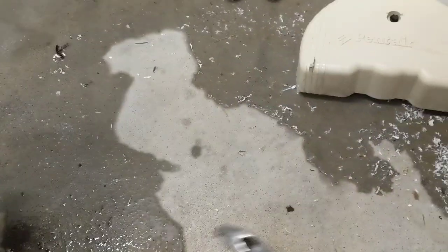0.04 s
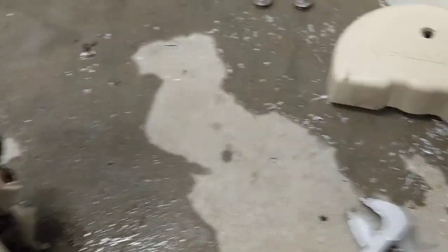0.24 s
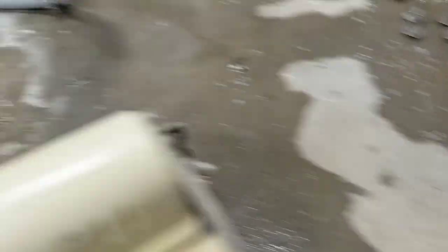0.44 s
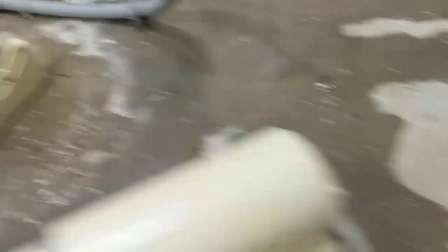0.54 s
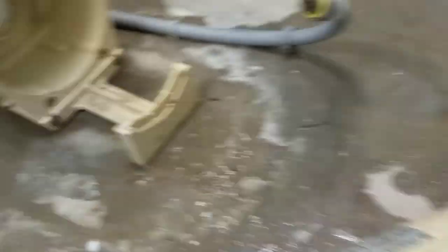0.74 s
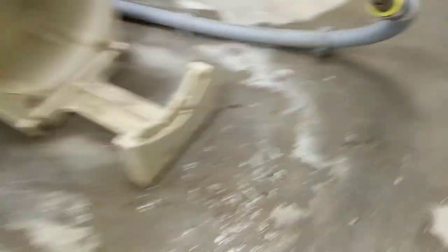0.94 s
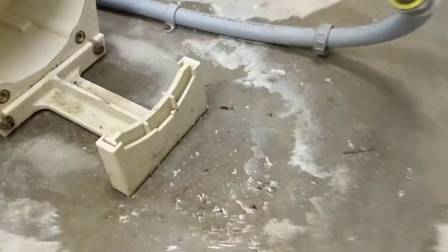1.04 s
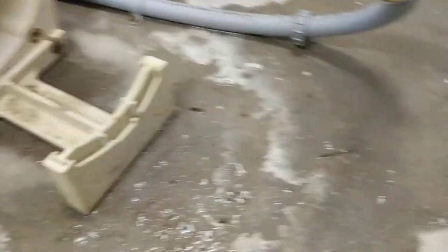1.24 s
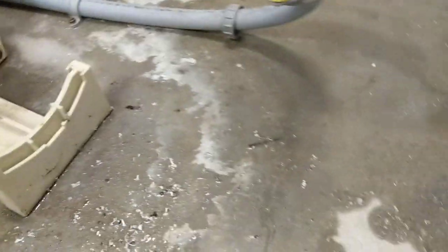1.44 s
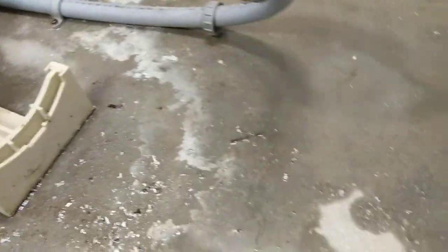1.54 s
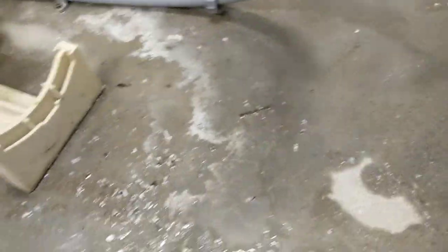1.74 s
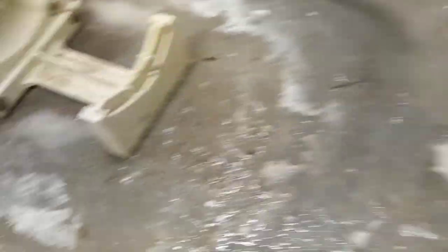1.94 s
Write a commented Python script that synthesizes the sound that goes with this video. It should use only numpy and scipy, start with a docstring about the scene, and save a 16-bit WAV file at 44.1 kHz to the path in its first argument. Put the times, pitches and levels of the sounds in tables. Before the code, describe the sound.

Three quick, bright clinks ring out close by as a dropped wrench bounces on concrete. After a short pause come boxy knocks, a gritty scrape and small clicks from a shifted plastic pump housing. The bare room echoes.

```python
"""A bare, echoing room with a concrete floor. A dropped steel wrench lands and bounces twice, each hit
a gritty crack and a dull clack under ringing steel modes. A second later a hollow plastic pump housing
is shifted: four boxy knocks and a scrape over grit, while small hard parts click.
Underneath lie a faint rumble and the dying echo of an earlier clatter.
Gain control ducks the mix after the loudest clink."""
import sys
import numpy as np
from scipy import signal
from scipy.fft import rfft, irfft
from scipy.io import wavfile
from scipy.ndimage import uniform_filter1d, minimum_filter1d

SR = 44100
rng = np.random.default_rng(int(sys.argv[2]) if len(sys.argv) > 2 else 0)


def bounce(signal):
    """Save signal as a 16-bit WAV file at the path given by the first command-line argument."""
    frames = np.transpose(np.atleast_2d(signal))
    limited = np.clip(frames, -1, 1)
    pcm = np.round(limited * 32767).astype(np.int16)
    wavfile.write(sys.argv[1], SR, pcm)


N = 88200
TIME = np.arange(N) / SR
FREQS = np.maximum(np.fft.rfftfreq(N, 1 / SR), 1)

# colour of the steady room tone: f/Hz, relative level/dB
RUMBLE_EQ = [(18, -54), (30, 3.5), (149, 2.5), (194, -0.5), (355, -7.5), (394, -4.5), (684, -5.5),
             (760, -4), (1010, -3), (1910, -16.5), (16000, -29.5)]
# colour of an earlier clatter still dying in the room: f/Hz, relative level/dB
ECHO_EQ = [(24, -37), (40, -6.5), (163, 0), (297, -14), (392, -4), (585, -18), (680, -8.5), (1410, -9),
           (1720, -14.5), (2770, -16), (3470, -14), (4680, -23), (6820, -12.5), (8340, -23), (16000, -44.5)]
# decay time of the reverb tail: f/Hz, t60/s
REVERB_T60 = [(60, 0.68), (250, 1.42), (600, 0.77), (2000, 0.8), (5000, 0.96), (7500, 0.85), (11000, 0.61),
              (16000, 0.48)]
# colour of the reverb tail: f/Hz, level/dB
REVERB_EQ = [(60, -8.5), (250, -6.5), (600, -5.5), (1100, -3), (2500, -6.5), (5000, 1.5), (7500, -1),
             (11000, -2), (16000, -11)]
# colour of the housing dragging over grit: f/Hz, relative level/dB
SCRAPE_EQ = [(300, -9), (1000, -12), (2400, 3.5), (3800, -14), (7500, -5.5), (10000, -12), (16000, -19)]
# small parts clicking: t/s, level/dB, low cut/Hz, ring f/Hz, ring level over the snap/dB, snap t60/s
PART_CLICKS = [(1.2945, -41, 7000, 10000, -11, 0.012), (1.2992, -33.5, 7000, 10700, -13, 0.031),
               (1.37, -29, 9000, 12000, -18, 0.0029), (1.3941, -35, 1750, 6170, -2, 0.047),
               (1.42, -41.5, 4000, 7040, -14, 0.036), (1.431, -27, 2230, 5040, -9, 0.09),
               (1.4361, -28.5, 2400, 4230, 2.5, 0.032), (1.4517, -19.5, 2400, 5340, -4, 0.038),
               (1.457, -30.5, 1960, 2630, 7, .04), (1.4948, -29, 4000, 6900, -22, 0.012),
               (1.5015, -24, 6000, 10100, -14, 0.0044), (1.5126, -20.5, 2460, 4750, -1.5, 0.022),
               (1.5155, -30, 2260, 2830, 9, 0.069), (1.5309, -14.5, 4530, 8000, -18, 0.003),
               (1.5338, -19, 4500, 7150, -26, 0.027), (1.5396, -18, 4560, 7950, -3.5, 0.011),
               (1.5437, -35, 1040, 2090, 5, 0.048), (1.7077, -32, 4100, 7540, -7, 0.042),
               (1.7272, -40, 5000, 7500, -22, .008), (1.925, -52.5, 1200, 1950, 1.5, 0.1),
               (1.977, -46, 2950, 7000, -13, 0.017)]
# colour of a click's snap: f/Hz, relative level/dB
SNAP_EQ = [(2000, 4), (3000, 0.5), (4000, -9.5), (5500, 0), (7500, 6.5), (9500, -6.5), (15000, -6.5),
           (18000, -26)]
# the housing's four knocks: t/s, thud level/dB, thud t60/s
HOUSING_KNOCKS = [(1.309, -24, 0.036), (1.3945, -21, 0.023), (1.5424, -18, 0.037), (1.7085, -23, 0.088)]
# colour of the plastic thud: f/Hz, relative level/dB
THUD_EQ = [(40, -21), (100, -2), (300, 4), (600, 9.5), (1000, -19), (2500, -17.5), (8000, -41)]
# modes of the hollow shell: f/Hz, t60/s, level/dB at each of the four knocks
HOUSING_MODES = [(145, .08, -37.5, -62, -47, -37), (222, 0.071, -30.5, -43, -35, -32),
                 (304, 0.035, -21, -27, -35, -37), (372, 0.047, -28, -23, -22.5, -24.5),
                 (425.5, 0.075, -27, -34, -29.5, -28.5), (478.5, 0.11, -21.5, -34, -37.5, -27),
                 (554, 0.14, -30, -25, -57, -41), (660, 0.053, -46, -24.5, -28.5, -26),
                 (755, 0.043, -32.5, -40, -27, -24.5), (945, .03, -36, -44, -55, -64),
                 (1354, 0.066, -38.5, -47, -35, -39.5), (1830, 0.06, -54, -54, -38, -47),
                 (2040, 0.071, -49, -50, -36, -50)]
# the wrench meets the floor: t/s, crack level/dB, crack t60/s, crack low cut/Hz, clack level/dB
WRENCH_LANDINGS = [(0.217, -22, 0.032, 3780, -24), (0.2783, -14, 0.029, 6100, -25.5),
                   (0.3664, -10, 0.071, 3380, -12)]
# colour of the dull part of a landing: f/Hz, relative level/dB
CLACK_EQ = [(60, -1.5), (150, -3.5), (300, -12), (600, -6), (1100, -3.5), (1600, -1.5), (2500, -6.5),
            (5000, -14), (16000, -32.5)]
# colour of steel cracking on concrete: f/Hz, relative level/dB
CRACK_EQ = [(1400, 0), (2500, -9), (5000, 1), (7500, 0), (9500, -8), (15000, -7), (18000, -26)]
# modes of the steel: f/Hz, t60/s, level/dB at each of the three landings
WRENCH_MODES = [(1772, 0.77, -29, -48, -63), (1936, 0.21, -36, -28, -52), (3370, 0.12, -42, -37, -10),
                (3545, 0.043, -48, -25, -5), (3440, .06, -43, -40, -10), (4078, 0.2, -51, -24, -18.5),
                (5166, 0.11, -36, -34, -4), (5237, 0.088, -22, -11.5, -8.5), (5298, 0.027, -29, -17, 3.5),
                (7007, 0.092, -13.5, -20.5, -8.5), (7130, 0.053, -16, -11.5, -5),
                (7445, 0.062, -32, -14, -5.5), (7720, 0.024, -19.5, -41.5, -31),
                (9780, 0.033, -48.5, -35, -24), (11180, 0.05, -27, -39.5, -10),
                (13100, 0.014, -39, -16, -28), (14670, 0.026, -45, -35, -29)]


def from_db(db):
    """Decibels to gain."""
    return 10 ** (np.asarray(db) / 20)


def at_hz(points, hz):
    """Read a table on a log-frequency axis."""
    freqs, values = np.transpose(points)
    return np.interp(np.log(hz), np.log(freqs), values)


def eq(points):
    """An EQ curve as a gain per frequency."""
    return from_db(at_hz(points, FREQS))


def low_cut(x, hz, order):
    """Butterworth high-pass."""
    return signal.sosfilt(signal.butter(order, hz, "high", fs=SR, output="sos"), x)


def noise(gain):
    """Noise of rms 1, coloured by a gain per frequency."""
    x = irfft(rfft(rng.standard_normal(N)) * gain, N)
    return x / x.std()


def fade(start, t60):
    """Percussive envelope: jump to 1, then fall 60 dB every t60 seconds."""
    out = np.zeros(N)
    i, j = np.searchsorted(TIME, [start, start + 2 * t60])
    out[i:j] = np.exp(-np.log(1000) * (TIME[i:j] - start) / t60)
    return out


def ring(start, hz, t60):
    """One struck mode: a decaying sine."""
    return fade(start, t60) * np.sin(2 * np.pi * hz * (TIME - start))


def room_tone():
    """The bed: steady rumble and the dying echo of an earlier clatter."""
    rumble = from_db(-54) * noise(eq(RUMBLE_EQ))
    echo = from_db(-40.5) * noise(eq(ECHO_EQ)) * fade(0, t60=1.58)
    return rumble + echo


def reverb(send, build_up_s=0.0048, slap_s=0.024):
    """A slap off one near wall and a dense tail that dies at its own rate in each band."""
    tail = np.zeros(N)
    white = rfft(rng.standard_normal(N))
    edges = np.geomspace(30, 20000, 25)
    for low, high in zip(edges, edges[1:]):
        hz = np.sqrt(low * high)
        envelope = fade(0, at_hz(REVERB_T60, hz)) * (1 - np.exp(-TIME / build_up_s))
        band = irfft(white * ((FREQS >= low) & (FREQS < high)), N)
        tail += from_db(at_hz(REVERB_EQ, hz)) * band * envelope / np.sqrt(np.sum(envelope ** 2))
    slap = from_db(-14) * np.interp(TIME - slap_s, TIME, send, left=0)
    return signal.fftconvolve(send, tail)[:N] + slap


def scrape(grain_db=3, grain_hz=400):
    """The housing drags over grit: a dying hiss, roughened by a fast random flutter in level."""
    grain = from_db(grain_db * noise(1 / (1 + (FREQS / grain_hz) ** 2)))
    grain /= np.sqrt(np.mean(grain ** 2))
    return from_db(-34.5) * noise(eq(SCRAPE_EQ)) * grain * fade(start=1.455, t60=0.73)


def small_parts():
    """Hard parts click: each bright, gritty snap excites one short resonance."""
    out = np.zeros(N)
    for start, db, cut_hz, ring_hz, ring_db, t60 in PART_CLICKS:
        bass_rolloff = 1 / np.sqrt(1 + (cut_hz / FREQS) ** 6)
        snap = noise(eq(SNAP_EQ) * bass_rolloff) * fade(start, t60)
        ping = signal.fftconvolve(snap, ring(0, ring_hz, t60=0.009))[:N]
        ping *= snap.std() / ping.std()
        out += from_db(db) * (snap + from_db(ring_db) * ping)
    return out


def housing(floor_echo_s=0.00405, floor_echo_db=-2):
    """Each knock is a soft thud plus hollow modes, the modes doubled by a reflection off the floor."""
    out = np.zeros(N)
    for knock, (start, thud_db, thud_t60) in enumerate(HOUSING_KNOCKS):
        out += from_db(thud_db) * noise(eq(THUD_EQ)) * fade(start, thud_t60)
        for mode, (hz, t60, *levels) in enumerate(HOUSING_MODES):
            floor_echo = from_db(floor_echo_db) * ring(start + floor_echo_s + rng.random() / hz, hz, t60)
            polarity = (-1) ** mode
            out += from_db(levels[knock]) * polarity * (ring(start, hz, t60) + floor_echo)
    return out


def wrench_clacks():
    """The short, dull part of each contact with the floor, giving the landing its body."""
    return sum(from_db(db) * noise(eq(CLACK_EQ)) * fade(start, t60=0.032)
               for start, *_, db in WRENCH_LANDINGS)


def wrench(chatter_s=0.0045, chatter_db=-1.5):
    """Steel hits concrete: each landing is a gritty double crack and rings its own mix of modes."""
    out = np.zeros(N)
    for landing, (start, db, t60, cut_hz, _) in enumerate(WRENCH_LANDINGS):
        # one end hits, the other touches just after
        double_hit = fade(start, t60) + from_db(chatter_db) * fade(start + chatter_s, t60)
        crack = noise(eq(CRACK_EQ)) * double_hit
        out += from_db(db) * low_cut(crack, cut_hz, order=6)
        for hz, mode_t60, *levels in WRENCH_MODES:
            out += from_db(levels[landing]) * ring(start + rng.random() / hz, hz, mode_t60)
    return low_cut(out, hz=1660, order=6)  # slim steel radiates next to nothing below its first mode


def scene():
    """Close-up hits over the bed; steel, shell and parts each have their own reverb send."""
    steel, shell = wrench(), housing()
    parts = small_parts() + scrape()
    # clicks and scrape send less treble into the room
    dark_parts = signal.sosfilt(signal.butter(1, 5100, "low", fs=SR, output="sos"), parts)
    wet = reverb(from_db(-2) * steel + from_db(4) * shell + from_db(-3.5) * dark_parts)
    return (steel + wrench_clacks() + shell + parts + wet + room_tone())[None]


def duck(level, threshold_db, release_db_per_s):
    """Gain that drops at once when the level passes a threshold, then recovers steadily."""
    over_db = np.maximum(20 * np.log10(level + 1e-9) - threshold_db, 0)
    release_db = release_db_per_s * TIME
    reduction_db = np.maximum.accumulate(over_db + release_db) - release_db
    return from_db(uniform_filter1d(minimum_filter1d(-reduction_db, size=45), size=45))  # 1 ms smoothing


def record(dry, rms_window_s=0.024):
    """The mic loses the deep bass; slow gain control and a fast limiter hold the peaks; the top is cut."""
    x = low_cut(dry[0], hz=52.4, order=2)
    rms = np.sqrt(np.abs(uniform_filter1d(x ** 2, size=int(rms_window_s * SR))))
    x = x * duck(rms, threshold_db=-13, release_db_per_s=21.5)
    x = x * duck(np.abs(x), threshold_db=-6.5, release_db_per_s=912)
    high_cut = signal.cheby2(14, 60, 16600, fs=SR, output="sos")
    return signal.sosfilt(high_cut, x)[None]


dry = scene()
out = record(dry)
bounce(out)
```